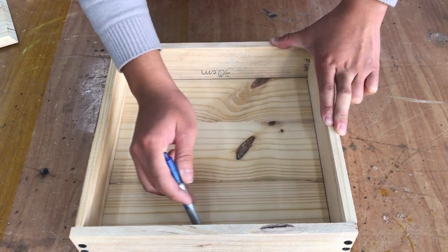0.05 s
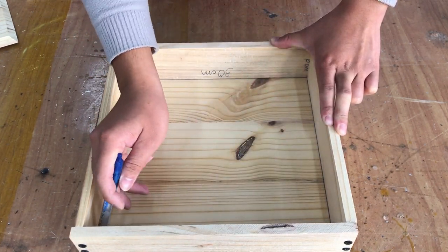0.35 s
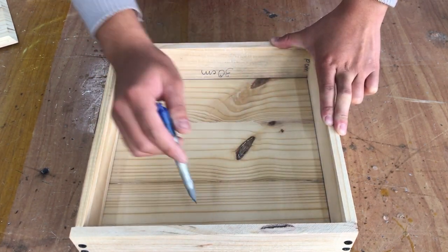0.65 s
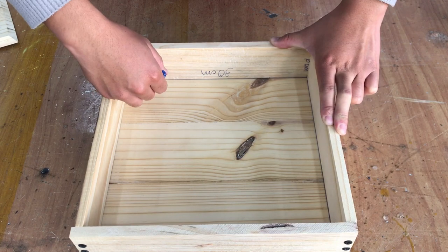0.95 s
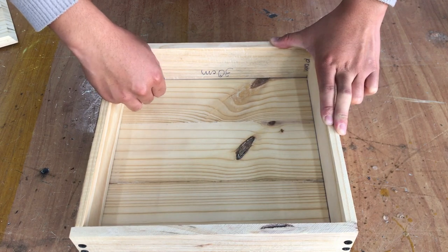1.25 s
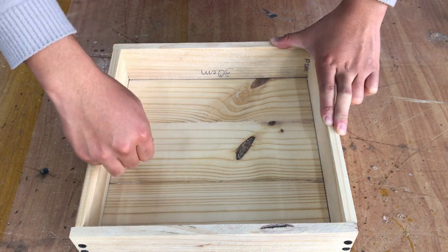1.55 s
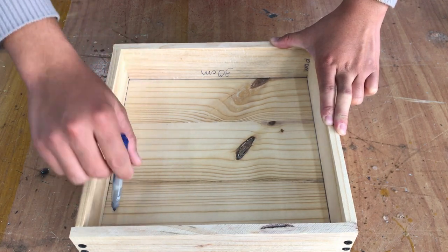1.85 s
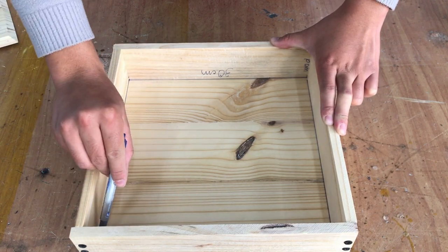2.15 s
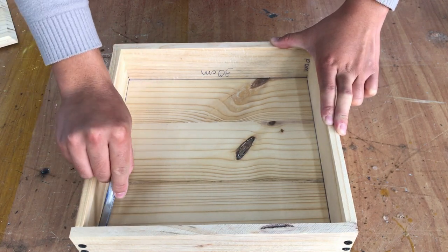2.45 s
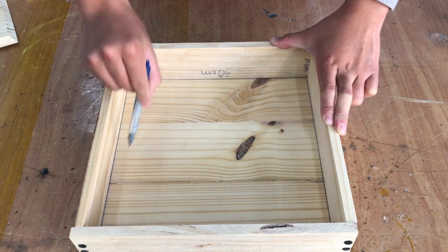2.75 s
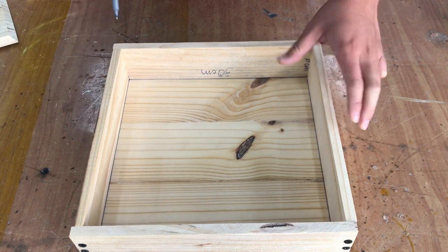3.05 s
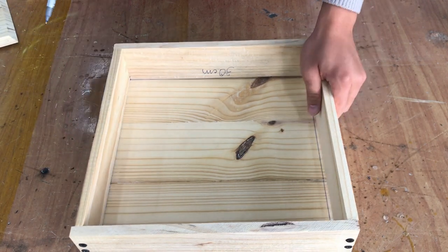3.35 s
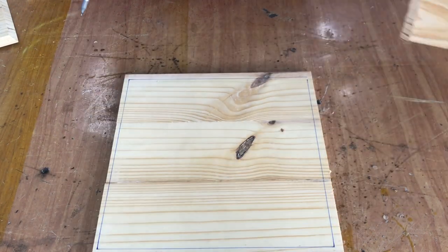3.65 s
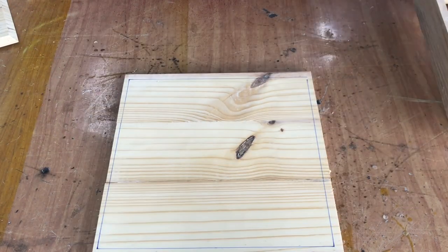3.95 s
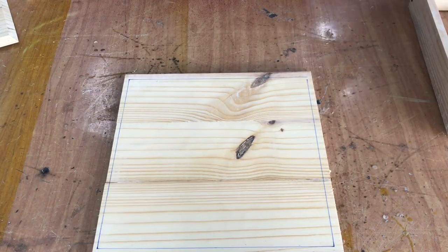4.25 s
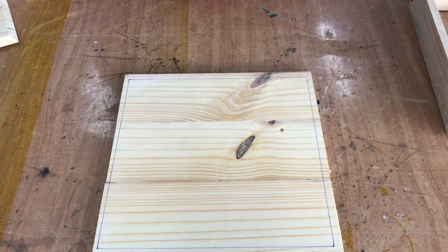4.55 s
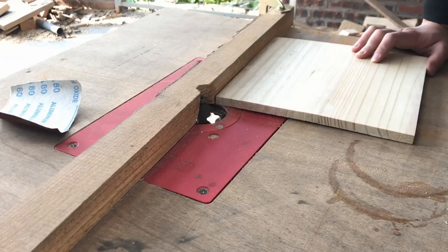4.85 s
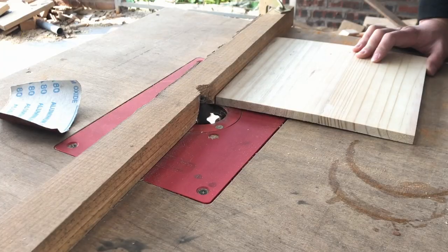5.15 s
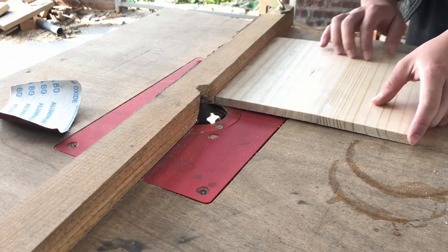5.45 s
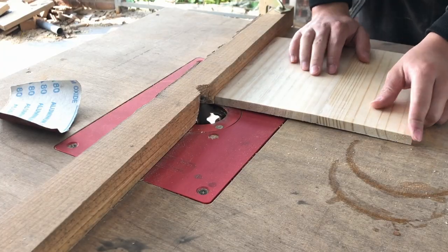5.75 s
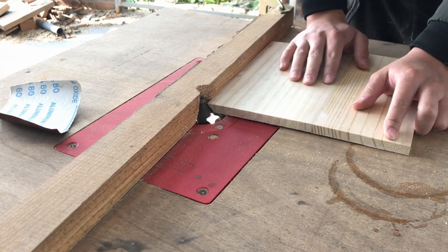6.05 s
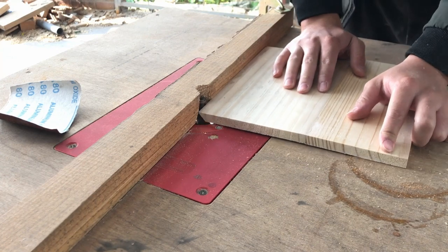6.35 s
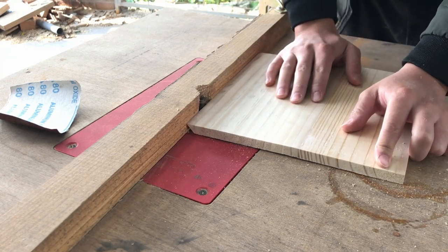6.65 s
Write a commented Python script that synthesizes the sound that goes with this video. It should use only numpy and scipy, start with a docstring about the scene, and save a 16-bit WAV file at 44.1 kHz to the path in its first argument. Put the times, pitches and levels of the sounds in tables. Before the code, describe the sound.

The microphone is close to the bench in a quiet, open workshop. For the first three seconds a pen scratches and rubs softly over wood in short, uneven strokes, with tiny squeaks and light taps. Chicks peep at a distance in short, falling whistles until about 5 seconds. A faint, far crow comes between 0.4 and 1 second, and a single call at 2.7. Light knocks fall near 2.8 and 3.1 seconds, then two clusters of sharper clacks around 4 and 4.2 as a wooden frame is set down, followed by brief scraping. At 4.9 seconds a table router switches on abruptly and spins up with rushing air, a throbbing drone and a rising whine. At about 6.1 the bit bites into the board: a loud, rasping howl with a hiss of chips, slowly sagging in pitch until the end, near 7 seconds.

```python
"""An open workshop, one microphone close to the bench. A pen scratches over the wood, tracing a frame
onto a board; chicks peep, and far off there is a faint crow, later a single call. Pen and frame are set
down with a few knocks. Near 5 s a table router is switched on and spins up with a rush of cooling air
and a throbbing drone. Near 6 s the board meets the two-flute bit: its blows, two a turn, merge into a
howl that slowly sags in pitch under the load."""
import sys
import numpy as np
from scipy import signal
from scipy.fft import rfft, irfft, next_fast_len
from scipy.io import wavfile
from scipy.ndimage import uniform_filter1d

SR = 44100
rng = np.random.default_rng(int(sys.argv[2]) if len(sys.argv) > 2 else 0)


def dump(signal):
    """Clip the signal to [-1, 1] and save it as 16-bit WAV at the path in sys.argv[1]."""
    limited = np.clip(np.atleast_2d(signal).T, -1, 1)
    pcm = np.round(limited * 32767).astype(np.int16)
    wavfile.write(sys.argv[1], SR, pcm)


N = 303828
TIME = np.arange(N) / SR
SWITCH_ON_S, BITE_S = 4.93, 6.071

# the loudest tones of the cut: t/s, then level/dB at 4, 6 and 8 times the turning rate
CUT_TONES = [(6.075, -18, -22, -22), (6.17, -20.5, -22, -38), (6.255, -16, -32, -23), (6.35, -20, -27, -28),
             (6.415, -22.5, -25, -17.5), (6.52, -23, -26.5, -31), (6.6, -16, -29, -25),
             (6.69, -22.5, -24, -26), (6.77, -23.5, -22.5, -26), (6.88, -33.5, -30, -18.5)]
# throbbing drone of the rotor's unbalance: t/s, level/dB
THROB = [(4.93, -36), (5.0, -37), (5.134, -24), (5.205, -43.5), (5.304, -32.5), (5.366, -20.5),
         (5.506, -26.5), (5.536, -34), (5.684, -31.5), (5.745, -22.5), (5.828, -33), (5.932, -24),
         (6.0, -26), (6.17, -32.5), (6.47, -44), (6.68, -32), (6.88, -41)]
# low modes of board and bench: f/Hz, level/dB, t60/s
BENCH_MODES = [(211, 1.5, 0.083), (255, -2.5, 0.11), (342, -1.5, 0.054), (430, -8, 0.08)]


def cut(speed, turns, grain_db=3.0, tear_db=1.3, odd_db=-6.5, rasp_db=1.5, spray_db=-15.0):
    """The flutes strike twice a turn, one deeper than the other; fibres tear unevenly, chips spray."""
    # lesser tones of the bit: multiple of the turning rate, level/dB, slope/(dB/s)
    howl_tones = [(3, -23.5, -18.5), (5, -30, -3), (7, -36, 0)]
    # spectrum of the bit's upper tones: f/Hz, level/dB
    rasp_spectrum = [(2900, -18), (4000, -21.5), (5000, -19.5), (6500, -22), (8000, -21), (9500, -17),
                     (10500, -24.5), (13000, -17.5), (15500, -21.5)]
    # resonances of table and fence, lit up as a tone sags through: f/Hz, width/Hz, level/dB
    fence_modes = [(3060, 460, 14.5), (3746, 68, 9), (4342, 166, 15.5), (4683, 130, 11), (5420, 87, 9),
                   (6400, 330, 9.5), (8160, 73, 2), (11600, 410, 5.5)]
    # load on the bit, heard in rasp and chips: t/s, level/dB
    bit_load = [(6.075, -12), (6.09, -12), (6.11, -21.5), (6.245, -18), (6.3, -22), (6.44, -23),
                (6.62, -23), (6.72, -21), (6.88, -22.5)]
    on = TIME > BITE_S
    _, sixfold, eightfold, load = (curve[on] for curve in in_time(CUT_TONES) + in_time(bit_load))
    phase = 2 * np.pi * (turns + .002 * drift(60))[on]   # the blows land slightly unevenly
    elapsed = TIME[on] - BITE_S

    def tone(k, db, uneven_db=grain_db):
        """One multiple of the turning rate, varied by the grain; high ones flutter faster."""
        flutter_hz = 8 + k / 2
        level = from_db(db + uneven_db * drift(flutter_hz)[on])
        return -np.sqrt(2) * level * np.cos(k * phase + .6 * drift(flutter_hz)[on])

    def response(hz):
        """Level/dB of an upper tone at its present pitch."""
        return at_hz(rasp_spectrum, hz) + sum(db * bump(hz, f, width) for f, width, db in fence_modes)

    flare_db = 10.5 * np.exp(-((elapsed - .018) / .0066) ** 2)   # the flutes first dig in
    scream = (tone(6, sixfold, uneven_db=1) + tone(8, eightfold, uneven_db=1)) * from_db(flare_db - 1)
    howl = sum(tone(round(k), db + slope * elapsed) for k, db, slope in howl_tones)
    rasp = sum(tone(k, response(k * speed[on]) + odd_db * (k % 2)) for k in range(9, 51))
    puffs = rng.standard_normal(N) * (1 + np.cos(2 * np.pi * turns))
    chips = coloured(puffs, [(500, -4.5), (1500, -9), (7000, 14.0), (15000, 3)])[on]
    sound = np.zeros(N)
    sound[on] = scream + howl + from_db(load) * (from_db(rasp_db) * rasp + from_db(spray_db) * chips)
    tearing = rms_one(from_db(tear_db * drift(130)))
    return sound * tearing * after(BITE_S, .007)


def hum(speed, turns, shudder_hz=273.6):
    """Unbalance sounds once a turn, the two flutes at even multiples, clearer under load."""
    phase = 2 * np.pi * turns
    loaded = after(BITE_S, .049)
    shudder_db = 10.5 * bump(speed, shudder_hz, width=9)   # the table shudders once on the way up
    twice_db = (1 - loaded) * (shudder_db - 35) - 22 * loaded
    idle_whine_db = np.maximum(-21.5 - .33 * (speed.max() - speed), -36)
    fourfold_db = np.where(TIME < BITE_S, idle_whine_db, in_time(CUT_TONES)[0] + 3.5)
    flutes = from_db(twice_db + 2 * drift(35)) * np.cos(2 * phase + .6 * drift(22))
    flutes += from_db(fourfold_db + drift(60)) * np.cos(4 * phase + .6 * drift(18))
    unbalance = from_db(in_time(THROB)[0] + 2.5) * np.sin(phase + (.4 + loaded) * drift(15))
    return (unbalance - flutes) * after(5.0, .11)


def cooling_air(speed, bright_hz=4830, build_s=.28):
    """The fan's rush starts with a jolt, builds up and brightens with speed."""
    # spectrum of the rush: f/Hz, level/dB
    air_spectrum = [(240, -62), (400, -6.5), (445, -13.5), (653, -5.5), (772, -13), (972, -4.5), (1190, -8),
                    (1300, -4), (1690, -7.5), (2920, -5), (4920, -12), (6480, -13), (7440, -17),
                    (9210, -14.5), (15500, -21)]
    # the rush of air sinks during the cut, then recovers: t/s, level/dB
    rush_dip = [(6.07, -1), (6.25, 1.5), (6.45, -1), (6.62, -8), (6.72, -8.5), (6.88, -2)]
    rush = coloured(rng.standard_normal(N) * from_db(1.25 * drift(300)), air_spectrum)
    dull = signal.sosfiltfilt(signal.butter(1, bright_hz, fs=SR, output="sos"), rush)
    jolt_db = 4.5 * np.exp(-np.abs(TIME - SWITCH_ON_S) / .023)
    rush_db = -24 + 4 * after(SWITCH_ON_S, build_s) ** 2 + jolt_db + in_time(rush_dip)[0]
    return from_db(rush_db) * (dull + (rush - dull) * (speed / speed.max()) ** 1.6)


def motor(speed, turns, blade_count=14):
    """Air rushes, the unbalance shakes the table and the blades whistle on the run-up, over a rumble."""
    # modes of table top and motor housing: f/Hz, width/Hz, level/dB
    table_modes = [(274, 34, -4.5), (306.3, 21, 5), (344.3, 13.5, 3), (610, 26, -32), (1030, 20, -20),
                   (1270, 97, -16)]
    air = cooling_air(speed)
    shake = rng.standard_normal(N)
    table = sum(from_db(db) * resonate(resonate(shake, hz, 2 * width), hz, 2 * width)
                for hz, width, db in table_modes)
    drone = from_db(in_time(THROB)[0] - 5) * rms_one(table)
    blades = np.sin(2 * np.pi * blade_count * turns + 1.1 * drift(120))
    whistle = blades * (from_db(-23.5) * bump(TIME, 4.977, .034) + from_db(-32.5) * bump(TIME, 5.05, .37))
    rumble = coloured(rng.standard_normal(N), [(25, -14), (80, -8.5), (170, -2), (500, -32), (2000, -33)])
    rumble *= from_db(-48.5) * after(4.69, .29)
    return (air + drone + whistle) * after(SWITCH_ON_S, .00084) + rumble


def spindle_speed(wobble_hz=.4):
    """Turns per second; the grain makes them waver once the bit is in the wood."""
    # the spindle leaps up, creeps to its free speed and sags in the wood: t/s, turning rate/Hz
    run_up = [(4.93, 85), (4.965, 175), (5.0, 222), (5.06, 258), (5.16, 276), (5.38, 301), (5.5, 314),
              (5.72, 317), (5.85, 326), (6.0, 336), (6.08, 340), (6.27, 337.5), (6.65, 321.5),
              (6.78, 313.8), (6.89, 309)]
    return in_time(run_up)[0] + wobble_hz * drift(9.5) * (TIME > BITE_S)


def knocks(thud_s=.0019):
    """Each blow thumps the bench, clacks in the wood and clicks; hardness trades thump for click."""
    # pen and frame knocking on wood: t/s, level/dB, hardness/dB, clack/dB
    contacts = [(0.3, -49, 15.5, -8), (1.109, -57, 2, 11), (2.833, -38.5, 8, -15), (3.098, -39.5, 0.5, -9),
                (3.9495, -38.5, 13, -5.5), (3.9755, -36, 16, -12), (3.987, -34.5, 13, -7),
                (3.997, -40, -1, -16), (4.136, -41, -4.5, -5.5), (4.177, -46, 1, -7),
                (4.188, -34, -4, -10.5), (4.205, -32.5, 14.5, -8), (4.214, -42, 1, -1), (4.25, -44, -5, -5)]
    # bright modes of a hard contact: f/Hz, level/dB, t60/s
    click_modes = [(2750, 4, 0.024), (3170, 2.5, 0.036), (4460, -1, 0.022), (5040, -8, 0.04),
                   (5590, -8.5, 0.073), (6412, -7.5, 0.1), (6850, -7, 0.063), (10800, -22, .026)]
    s, strength, hardness, clack_db = np.transpose(contacts)
    bright, dull = strength + hardness, strength - hardness

    def blows(db):
        """One impulse a blow."""
        return np.bincount((s * SR).astype(int), from_db(db), N)

    def burst(db, fade_s, low_hz, high_hz):
        """Dense, quickly dying modes, as a band of noise."""
        fade = signal.lfilter([1], [1, -np.exp(-1 / (fade_s * SR))], blows(db) + 1e-18)
        fade = uniform_filter1d(fade, int(.005 * SR))
        return fade * rms_one(band(rng.standard_normal(N), low_hz, high_hz))

    soft_contact = signal.butter(2, 1 / thud_s, fs=SR)
    push = signal.lfilter(*soft_contact, blows(dull + .5) + 1e-18)
    thump = sum(from_db(db) * ring(push, hz, t60) for hz, db, t60 in BENCH_MODES)
    spot_db = rng.uniform(-3, 3, (len(s), len(click_modes)))   # each blow favours other modes
    click = sum(ring(blows(bright - 16 + db + spot_db[:, k]), hz, t60) * (-1) ** k
                for k, (hz, db, t60) in enumerate(click_modes))
    clack = burst(strength + clack_db, fade_s=.011, low_hz=440, high_hz=2500)
    crack = burst(bright - 16.5, fade_s=.0075, low_hz=1600, high_hz=15000)
    return shop(thump + click + clack + crack, wet_db=-12.5)


def pen(grain_db=1.5, ridge_db=2.0, press_s=.018, lift_s=.029):
    """The tip catches on fibres and bumps over growth rings; the board drums, the barrel resonates."""
    # pen, hand and frame sliding on wood: start/s, end/s, level/dB, scratch/dB, swell/dB, drumming/dB
    strokes = [(0, .315, -53.5, -1, -2.5, -5.5), (.403, 0.58, -61.5, -3.5, -9, -22),
               (0.543, 0.692, -57, 4, 13.5, -28), (.658, 0.816, -57, -14, -11, -27),
               (1.108, 1.28, -58.5, -11, -5, -16), (1.36, 1.619, -59, 3, 8.5, -7),
               (1.6, 1.895, -59, 1, 0.5, -3.5), (1.864, 2.24, -59.5, -14, -3, -24),
               (2.45, 2.62, -65.5, -17, -2, -14), (2.59, 2.864, -59.5, 1.5, 10.5, -10),
               (3.058, 3.2, -52.5, 4, 3.5, -5), (3.461, 3.6, -64.5, 0, -11, -11),
               (4.258, 4.428, -55.5, -2, 3, -13), (4.512, 4.718, -65, 1.5, 9, -10)]
    # spectrum of the dull rubbing: f/Hz, level/dB
    rub_spectrum = [(88, -43), (150, -7), (204, -11.5), (367, -2.5), (507, -4.5), (700, -0.5), (1550, 1),
                    (2100, -2), (3950, -15), (5000, -20), (6500, -18), (11000, -120)]
    # spectrum of the bright scratching: f/Hz, level/dB
    scratch_spectrum = [(1470, -59), (2500, 4), (3950, -5.5), (4890, -2.5), (6850, -6.5), (7860, -8),
                        (9080, -7), (15500, -8)]
    # short squeaks of the pen, and one low ring after a tap: t/s, length/s, f/Hz, level/dB
    short_notes = [(.725, 0.046, 1910, -57), (1.114, 0.047, 438, -56), (1.385, 0.12, 1600, -60.5),
                   (1.78, 0.098, 1630, -65), (2.777, 0.085, 1604, -60)]
    # resonances of the pen barrel: f/Hz, width/Hz, level/dB
    barrel_modes = [(1536, 19, -4), (4060, 290, 4), (6500, 600, -5.5), (9200, 600, -13)]
    rub, scratch, drum = np.zeros((3, N))
    for start, end, db, scratch_db, swell_db, drum_db in strokes:
        span = slice(int(start * SR), int(end * SR))
        t = TIME[span]
        landing_s = press_s * from_db(swell_db)   # a fading stroke lands hard, a swelling one gently
        contact = np.clip(np.minimum((t - start) / landing_s, (end - t) / lift_s), 0, 1)
        pressure = contact * from_db(db + swell_db * ((t - start) / (end - start) - .5))
        rub[span] += pressure
        scratch[span] += pressure * from_db(scratch_db)
        drum[span] += pressure * from_db(drum_db)
    catches = from_db(grain_db * drift(300) + ridge_db * drift(25)) * rng.standard_normal((2, N))
    tip = rub * coloured(catches[0], rub_spectrum) + scratch * coloured(catches[1], scratch_spectrum)
    board = drum * rms_one(sum(from_db(db) * resonate(catches[0], hz, 28) for hz, db, _ in BENCH_MODES))
    held_notes = [(s, length, hz, hz, db) for s, length, hz, db in short_notes]
    tones = whistles(held_notes, gain_db=6.0, octave_db=-18, quaver=.013)
    barrel = sum(from_db(db) * resonate(tip, hz, width) for hz, width, db in barrel_modes)
    return shop(tip + board + tones + barrel, wet_db=-16.5)


def chicks():
    """Each peep is a short, steeply falling whistle."""
    # peeps: t/s, length/s, first f/Hz, last f/Hz, level/dB
    peeps = [(.32, 0.1, 4720, 2570, -64.5), (.435, 0.085, 4450, 2360, -61.5), (.58, 0.066, 4720, 3000, -61),
             (.835, 0.11, 4600, 2590, -62.5), (1.11, 0.097, 4530, 3280, -68),
             (1.255, 0.12, 4800, 2670, -57), (1.46, 0.087, 4500, 2305, -54.5),
             (1.675, 0.078, 4500, 3100, -58.5), (2.02, 0.15, 5150, 2320, -59.5),
             (2.2, .12, 4430, 2065, -59.5), (2.23, 0.097, 5130, 3020, -56), (2.37, .1, 5380, 2950, -63.5),
             (2.525, 0.084, 5130, 2270, -58.5), (2.62, .135, 4650, 2310, -62.5),
             (2.775, 0.15, 4540, 2240, -59), (3.285, 0.07, 4650, 3190, -68.5),
             (3.412, 0.073, 5170, 2790, -60), (3.51, 0.099, 4430, 2180, -64.5),
             (3.65, 0.086, 5470, 3070, -58), (3.725, 0.084, 4450, 2400, -61.5),
             (3.845, .11, 5300, 2830, -55.5), (4.135, .07, 4730, 3480, -58), (4.31, 0.12, 4440, 2510, -54),
             (4.455, .08, 5000, 2900, -58), (4.515, 0.083, 4350, 2490, -55), (4.56, .11, 4630, 2134, -54),
             (4.75, 0.07, 4440, 3220, -62), (4.83, 0.14, 4340, 2630, -54.5)]
    return whistles(peeps, gain_db=4.0, octave_db=-18, quaver=.028, swell_db=2.0)


def distant_fowl(fall=.043):
    """A faint crow far off, later a single call; each note sinks by a small share of its pitch."""
    # notes: t/s, length/s, f/Hz, level/dB
    notes = [(.44, 0.19, 835, -68), (.685, .11, 693, -57.5), (.825, 0.081, 664, -56),
             (0.9, 0.065, 673, -67), (2.694, .12, 690, -60)]
    sinking = [(s, length, hz, hz * (1 - fall), db) for s, length, hz, db in notes]
    return whistles(sinking, gain_db=2.5, octave_db=-28, quaver=.019)


def room_tone():
    """The quiet of the workshop: a faint, steady noise, strongest in the bass."""
    # spectrum of the background: f/Hz, level/dB
    room_spectrum = [(15, -34), (25, -0.5), (86, 3.5), (523, -6), (631, -5), (1490, -10.5), (2060, -11.5),
                     (2850, -9.5), (4260, -18.5), (5880, -21), (15500, -25.5)]
    return from_db(-62) * coloured(rng.standard_normal(N), room_spectrum)


def shop(x, wet_db, t60=.21, wall_cut_hz=6900):
    """Direct sound plus a dull, diffuse tail off the walls, at unchanged power."""
    t = TIME[:SR]
    tail = band(rng.standard_normal(SR), 92, wall_cut_hz) * np.exp(-np.log(1000) * t / t60) * (t > .004)
    wet = from_db(wet_db)
    return (x + wet * signal.fftconvolve(x, tail / np.linalg.norm(tail))[:N]) / np.sqrt(1 + wet ** 2)


def whistles(calls, gain_db, octave_db, quaver, swell_db=0.0):
    """Each call is a gliding, fluttering whistle with a weak octave; it swells and fades."""
    out = np.zeros(N)
    waver = 1 + quaver * drift(78)
    for s, length, first_hz, last_hz, db in calls:
        span = slice(int(s * SR), int((s + length) * SR))
        u = np.linspace(0, 1, span.stop - span.start)
        phase = 2 * np.pi * np.cumsum((first_hz + (last_hz - first_hz) * u) * waver[span]) / SR
        swell = np.sqrt(np.abs(np.sin(np.pi * u))) * from_db(db + gain_db + swell_db * (u - .5))
        out[span] += swell * (np.sin(phase) + from_db(octave_db) * np.sin(2 * phase))
    return out * rms_one(from_db(4 * drift(70)))


def from_db(db):
    """Decibels to gain."""
    return 10 ** (np.asarray(db) / 20)


def rms_one(x):
    """Scale to unit rms."""
    return x / np.sqrt(np.mean(x ** 2) + 1e-20)


def in_time(rows):
    """Each column of a curve at every sample."""
    s, *columns = np.transpose(rows)
    return [np.interp(TIME, s, c) for c in columns]


def at_hz(points, hz):
    """Read a spectrum on a log-frequency axis."""
    f, db = np.transpose(points)
    return np.interp(np.log(hz + 1), np.log(f), db)


def after(start_s, rise_s):
    """A ramp from silence to full level."""
    return np.clip((TIME - start_s) / rise_s, 0, 1)


def bump(x, centre, width):
    """A resonance-shaped swell: 1 at the centre, a half at half the width to either side."""
    return 1 / (1 + (2 * (x - centre) / width) ** 2)


def drift(rate_hz):
    """A slow random wander with a spread of one."""
    r = np.exp(-80 * np.pi * rate_hz / SR)
    slow = signal.lfilter([1], [1, -2 * r, r * r], rng.standard_normal(N // 40 + 2002))[2000:]
    return np.interp(np.arange(N) / 40, np.arange(len(slow)), rms_one(slow))


def coloured(x, spectrum):
    """Give a steady excitation a spectrum (f/Hz, level/dB); rms 1."""
    size = next_fast_len(N)
    gain = from_db(at_hz(spectrum, np.arange(size // 2 + 1) * SR / size))
    return rms_one(irfft(rfft(x, size) * gain, size)[:N])


def band(x, low_hz, high_hz):
    """Band-pass."""
    return signal.sosfilt(signal.butter(2, [low_hz, high_hz], "band", fs=SR, output="sos"), x + 1e-18)


def ring(clicks, hz, t60):
    """A unit click sets a sine of height 1 ringing."""
    r, w = np.exp(-np.log(1000) / (t60 * SR)), 2 * np.pi * hz / SR
    return signal.lfilter([0, np.sin(w)], [1, -2 * r * np.cos(w), r * r], clicks + 1e-18)


def resonate(x, hz, width_hz):
    """A resonance with a gain of 1 on top."""
    r, w = np.exp(-np.pi * width_hz / SR), 2 * np.pi * hz / SR
    return signal.lfilter(np.array([1, 0, -1]) * (1 - r * r) / 2, [1, -2 * r * np.cos(w), r * r], x)


def scene():
    """Bench work and router close to the microphone, poultry at a distance, room tone underneath."""
    speed = spindle_speed()
    turns = np.cumsum(speed) / SR
    router = motor(speed, turns) + hum(speed, turns) + shop(cut(speed, turns), wet_db=-14, t60=.3)
    poultry = shop(chicks() + distant_fowl(), wet_db=3, t60=.22)
    mono = router + poultry + room_tone() + pen() + knocks()
    return np.array([mono, mono])


def record(dry, peak_limit=.88, cutoff_hz=15900):
    """The highest peaks are rounded and the top treble is cut."""
    rounded = dry / (1 + (dry / peak_limit) ** 4) ** .25
    return signal.sosfilt(signal.ellip(10, .1, 80, cutoff_hz, fs=SR, output="sos"), rounded)


dry = scene()
out = record(dry)
dump(out)
```